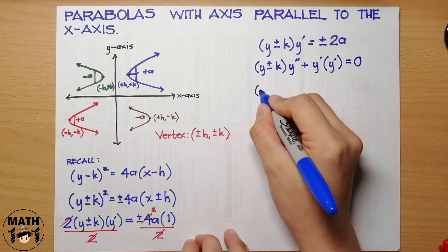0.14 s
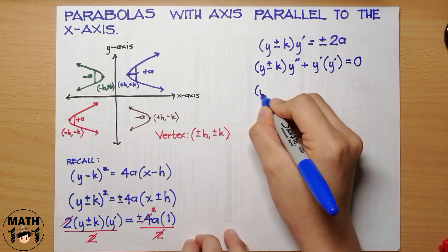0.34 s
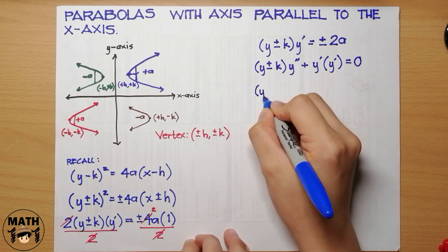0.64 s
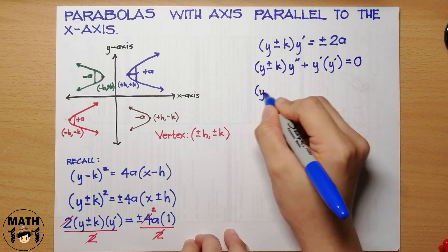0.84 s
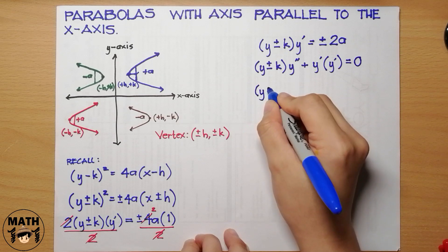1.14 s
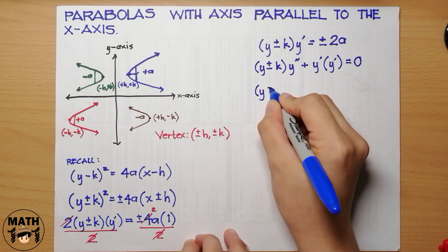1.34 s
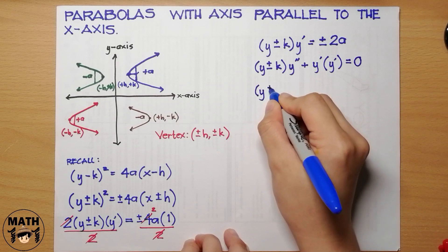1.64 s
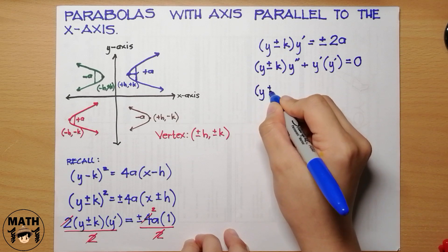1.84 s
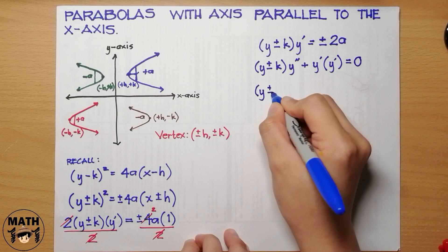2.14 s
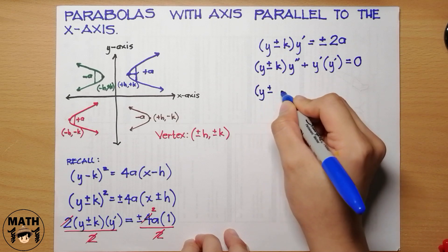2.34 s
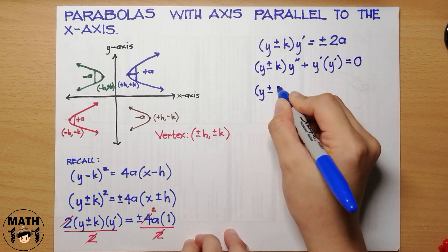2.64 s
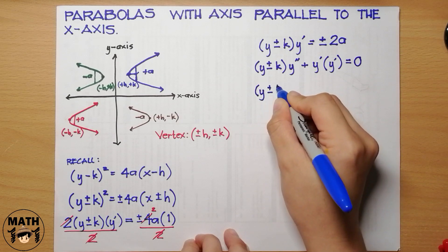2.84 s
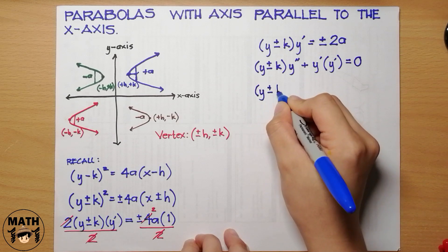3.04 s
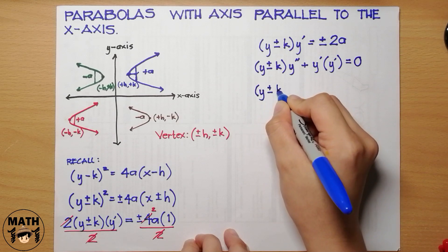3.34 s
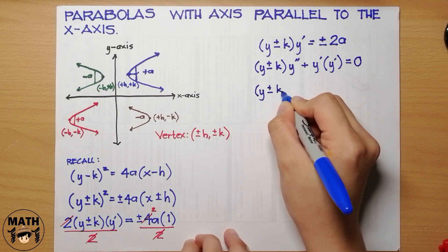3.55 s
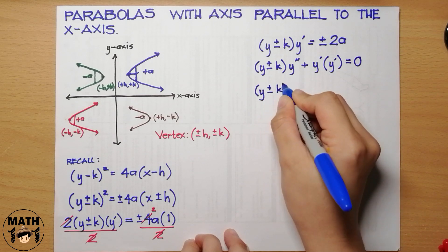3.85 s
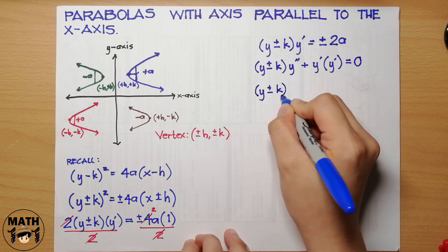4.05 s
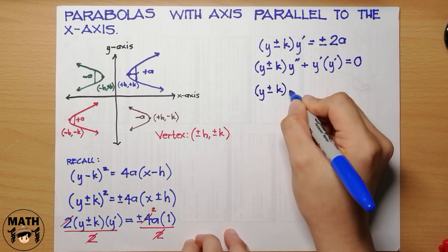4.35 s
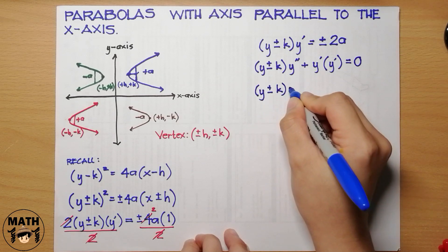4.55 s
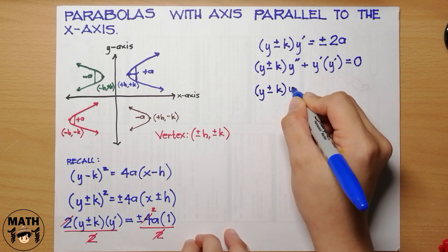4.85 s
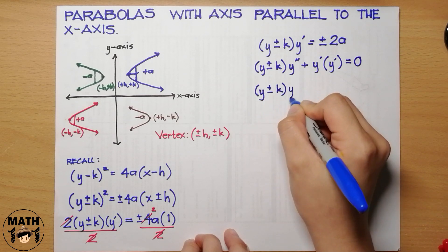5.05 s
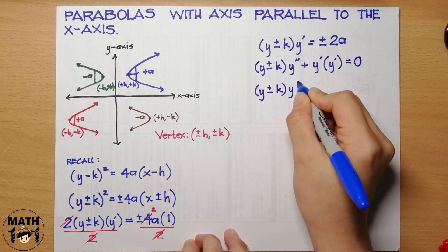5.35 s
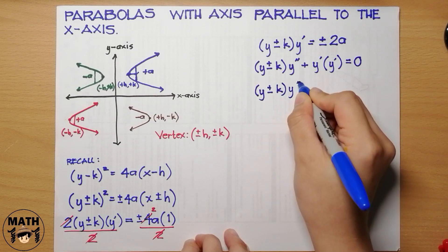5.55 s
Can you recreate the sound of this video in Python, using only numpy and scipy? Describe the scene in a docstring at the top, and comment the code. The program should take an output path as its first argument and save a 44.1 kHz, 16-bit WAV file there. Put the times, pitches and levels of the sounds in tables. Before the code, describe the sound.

A felt-tip marker writes on a sheet of paper on a wooden desk, close to the microphone in a quiet room. Short dry rubs and raspy scratches come in small groups, densest around the first second, then sparser single strokes with pauses. Tiny pen clicks, felt ticks and dull hand bumps fall between them. A very low hum, slow uneven drone and faint hiss run throughout.

```python
"""Felt-tip marker on paper

A felt-tip marker writes a line of algebra on a sheet of paper lying on a wooden desk, close to a microphone.
Stick-slip of the felt on the fibres makes each stroke: random impulses, stronger with tip speed, are
filtered into a woody rub, a rasp and a bright scratch. Decaying noise bursts make the ticks and brushes of the
felt and the pen's small creak, knocks and clicks; damped sines make the bumps of the hand on the desk.
Two drifting sines make a low hum and drone, with a boom of the desk, over the filtered noise of the room."""
import sys
import numpy as np
from scipy.fft import rfft, irfft, next_fast_len
from scipy.io import wavfile
from scipy.ndimage import map_coordinates

SR = 44100
rng = np.random.default_rng(int(sys.argv[2]) if len(sys.argv) > 2 else 0)


def wrap_up_sound(samples):
    """Save the sound to the file named by the first command line argument, as 16-bit audio."""
    columns = np.atleast_2d(samples).T
    # keep every value between -1 and 1, then stretch to whole-number steps
    tamed = np.clip(columns, -1, 1)
    steps = np.round(tamed * 32767).astype(np.int16)
    wavfile.write(sys.argv[1], SR, steps)


N = 250652  # length [samples]


def amp(db):
    """Decibel law: the amplitude ratio of a level in dB."""
    return 10 ** (np.asarray(db) / 20)


def unit(x):
    """Normalisation: scale to a root mean square of 1."""
    return x / np.sqrt(np.mean(x ** 2) + 1e-20)


def along(points, hz):
    """Logarithmic interpolation: (frequency, level) points read on a log frequency axis."""
    frequencies, levels = np.transpose(points)
    return np.interp(np.log(hz + 1), np.log(frequencies + 1), levels)


def wobble(rate):
    """Band-limited randomness: a smooth curve through random knots, rate of them a second."""
    knots = rng.standard_normal(int(N * rate / SR) + 4)
    return map_coordinates(knots, [np.arange(N) * rate / SR])


def coloured(x, colour):
    """Minimum-phase filtering: a causal filter of unit power gain, shaped by colour(Hz) in dB."""
    size = 2 * next_fast_len(len(x) // 2 + 4096)
    gain = unit(amp(colour(np.fft.rfftfreq(size, 1 / SR))))
    cepstrum = irfft(np.log(gain + 1e-6))
    # folding the cepstrum onto positive times makes the filter causal
    cepstrum[1:size // 2] *= 2
    cepstrum[size // 2 + 1:] = 0
    response = np.exp(rfft(cepstrum))
    return irfft(rfft(x, size) * response)[:len(x)]


def add(out, start, db, sound):
    """Superposition: add a short sound at start [s] with its peak at db."""
    out[round(start * SR):][:len(sound)] += amp(db) * sound / np.abs(sound).max()


# Resonances of pen, sheet and desk, and one hollow near 10.5 kHz: (centre frequency [Hz], full width at 1/e of
# the lift [Hz], relative lift [dB])
BODY_RESONANCES = [(540, 84, 9.5), (663, 72, 11), (744.4, 118, 13.5), (855, 160, 10), (1070.5, 73, 11.5),
                   (1131, 48, 10), (1294, 82, 10.5), (1400, 143, 10.5), (1721, 117, 10.5), (2018, 115, 10),
                   (2142, 137, 15), (2320, 260, 10.5), (2556, 82, 10), (2707, 67, 8.5), (2980, 150, 10.5),
                   (3190, 200, 5), (3520, 1050, 6.5), (4390, 97, 11.5), (5470, 530, 6), (6670, 650, 8),
                   (7450, 130, 13), (8390, 450, 6), (8810, 500, 7), (9500, 280, 0.5), (10500, 350, -4),
                   (11380, 330, 6.5)]


def body(hz):
    """Resonance: the lift in dB that the struck or rubbed body gives near each of its modes."""
    return sum(lift * np.exp(-(2 * (hz - centre) / width) ** 2) for centre, width, lift in BODY_RESONANCES)


def tip_speed(start, rise, fall):
    """Kinematics: the tip speeds up from rest to 1 and slows to rest again, in two quarter sines."""
    corners = [start, start + rise, start + rise + fall]
    return np.sin(np.pi / 2 * np.interp(np.arange(N) / SR, corners, [0, 1, 0]))


def catches(rate, spread_db):
    """Stick-slip: fibres catch and let go at random moments, each with its own sign and strength."""
    caught = rng.random(N) < rate / SR
    signs = rng.choice([-1, 1], N)
    strengths = amp(spread_db * rng.standard_normal(N))
    return unit(caught * signs * strengths)


def friction(colour, grip, levels_db, power, rate):
    """Source and filter: catches, stronger the faster the tip moves, ring through the resonances."""
    forces = [amp(db) * tip_speed(*stroke[:3]) ** power for stroke, db in zip(STROKES, levels_db)]
    force = np.max(forces, axis=0)  # where strokes overlap, the stronger one counts
    excitation = force * grip * catches(rate, spread_db=2.5)
    return coloured(excitation, lambda hz: along(colour, hz) + body(hz))


# Movements of the tip: (start time [s], speeding-up time [s], slowing-down time [s],
# then the relative levels at full speed of rub [dB], rasp [dB] and scratch [dB])
STROKES = [ (-0.06, 0.1, 0.093, -54.5, -66, -59), (0.075, 0.074, 0.049, -58, -60, -71),
           (0.664, 0.049, 0.097, -57.5, -65, -69), (0.802, 0.03, 0.084, -59, -59, -55),
           (0.87, 0.047, 0.036, -61, -60, -71), (1.01, 0.057, .12, -54.5, -59, -64),
           (1.11, 0.059, .02, -52, -70, -57), (1.18, 0.025, 0.021, -52, -45.5, -49.5),
           (1.72, .016, 0.069, -54.5, -59.5, -67.5), (2.081, 0.042, 0.058, -56.5, -61, -65.5),
           (2.459, 0.017, 0.091, -53.5, -53.5, -58), (3.3, 0.063, 0.096, -55.5, -58.5, -64),
           (3.671, 0.014, 0.079, -58.5, -71, -56.5), (3.86, 0.052, 0.081, -57, -59, -67),
           (4.28, 0.091, 0.13, -56, -59, -66), (4.41, 0.077, 0.023, -59, -60.5, -53.5),
           (5.088, 0.017, .115, -57.5, -61.5, -68), (5.178, 0.041, 0.096, -61, -63.5, -57),
           (5.35, 0.088, .09, -59.5, -58.5, -65), (5.45, 0.096, 0.024, -57.5, -58.5, -52.5), ]
# Colour of the desk's rub: (frequency [Hz], relative level [dB])
RUB_COLOUR = [(120, -35), (250, -0.5), (400, -2.5), (600, -4), (1000, 1), (1400, 5), (1800, 5.5),
              (2200, -5.5), (2800, -2.5), (4000, -15), (8000, -30), (16000, -41)]
# Colour of the sheet's rasp: (frequency [Hz], relative level [dB])
RASP_COLOUR = [(600, -28.5), (1800, -8.5), (2500, -3.5), (3400, 0), (4200, -4.5), (5000, -11.5),
               (8000, -20.5), (16000, -12)]
# Colour of the felt's fast scratch: (frequency [Hz], relative level [dB])
SCRATCH_COLOUR = [(300, -35), (1000, -14), (2000, 0), (2800, -4.5), (3700, -2), (5000, -4), (8000, -0.5),
                  (9500, 4), (11500, -3.5), (13000, 1), (14200, -3), (15500, -10)]
# each layer grows as tip speed to this power: the scratch needs the most speed
RUB_POWER, RASP_POWER, SCRATCH_POWER = 0.79, 0.84, 1.14


def marker(judder_db, tooth_db, rub_db, rasp_db, scratch_db):
    """Dry friction: uneven paper shakes the grip; the more frequent the catches, the brighter the layer."""
    grip = unit(amp(judder_db * wobble(70) + tooth_db * wobble(450)))
    *_, rubs, rasps, scratches = np.transpose(STROKES)
    # rates are mean catches a second
    rub = friction(RUB_COLOUR, grip, rubs + rub_db, RUB_POWER, rate=7000)
    rasp = friction(RASP_COLOUR, grip, rasps + rasp_db, RASP_POWER, rate=14000)
    scratch = friction(SCRATCH_COLOUR, grip, scratches + scratch_db, SCRATCH_POWER, rate=15000)
    return rub + rasp + scratch


# Level of the low drone near 65 Hz, with the desk's boom near 1.14 s: (time [s], relative level [dB])
DRONE_LEVEL = [(0.0, -55.5), (0.3, -46.5), (0.33, -56), (1.0, -54), (1.14, -39.5), (1.33, -56), (1.74, -60),
               (1.79, -45.5), (2.21, -59.5), (2.26, -48.5), (2.58, -64.5), (2.61, -50.5), (3.81, -48),
               (3.92, -54.5), (4.46, -49.5), (4.71, -57.5), (5.16, -50), (5.68, -65.5)]
HUM_HZ = 32.63  # mean turning rate


def hum(shaft_db, sway_db, drone_db, drift):
    """Harmonics of rotation: a slow machine hums at its turning rate, under a drone about an octave above."""
    def phase():
        """Phase as the integral of frequency; every call draws its own drift."""
        return 2 * np.pi * np.cumsum(HUM_HZ * (1 + drift * wobble(6))) / SR

    shaft = amp(shaft_db + sway_db * wobble(10)) * np.sin(phase())
    level_db = np.interp(np.arange(N) / SR, *np.transpose(DRONE_LEVEL))
    drone = amp(level_db + drone_db) * np.sin(2 * phase())
    return np.sqrt(2) * (shaft + drone)  # a sine of rms 1 peaks at root 2


# Colour of the building's rumble: (frequency [Hz], relative level [dB])
RUMBLE_COLOUR = [(10, -37.5), (25, -9.5), (40, -5.5), (49, 2.5), (57, -3), (78, 2.5), (96, -11),
                 (130, -6.5), (170, -18.5), (250, -21.5), (290, -25.5), (380, -27.5), (500, -41.5),
                 (900, -71.5)]
# Colour of the faint hiss: (frequency [Hz], relative level [dB])
HISS_COLOUR = [(200, -10), (500, -1), (1100, 0), (1800, -3.3), (3600, -2.5), (4500, -6), (4900, -9),
               (5400, -6.5), (9700, -7.5), (10400, -13), (11000, -8.5), (13000, -7.5), (15500, -10)]


def room(rumble_db, hiss_db):
    """Stationary noise: low rumble of the building under an even, faint hiss."""
    rumble = coloured(rng.standard_normal(N), lambda hz: along(RUMBLE_COLOUR, hz))
    hiss = coloured(rng.standard_normal(N), lambda hz: along(HISS_COLOUR, hz))
    return amp(rumble_db) * rumble + amp(hiss_db) * hiss


def contact_burst(centre, width, t60, body_share):
    """Contact excitation: a short decaying burst of noise rings in its own band and in the body."""
    t = np.arange(SR // 8) / SR
    burst = rng.standard_normal(len(t)) * amp(-60 * t / t60)

    def band(hz):
        """Single-resonance response in dB."""
        detuning = (hz ** 2 - centre ** 2) / (2 * width * (hz + 1))
        return -20 * np.log10(1 + detuning ** 2)

    return coloured(burst, lambda hz: band(hz) + body_share * body(hz))


# The felt touches the paper with a dry tick or a faint, longer brush:
# (time [s], relative peak level [dB], decay time by 60 dB of the burst, which is cut at 1/8 s [s])
TOUCHES = [(0.584, -56.5, 0.028), (1.288, -50.5, 0.034), (1.619, -53, 0.023), (2.666, -53.5, 0.34),
           (2.809, -53.5, 0.08), (3.509, -48.5, 0.037), (4.556, -59, 0.2), (4.599, -56, 0.058)]
TOUCH_HZ, TOUCH_WIDTH_HZ = 5300, 7500
# Small creak, knocks and clicks of the pen: (time [s], relative peak level [dB],
# ring frequency [Hz], bandwidth [Hz], decay time by 60 dB of the burst [s])
PEN_NOISES = [(0.33, -50, 3830, 450, 0.018), (0.33, -53, 970, 500, 0.022), (0.342, -51, 2740, 220, .021),
              (0.364, -55, 2700, 220, 0.033), (0.423, -58, 1190, 900, .03), (0.449, -52.5, 990, 800, .047),
              (0.558, -42.5, 1230, 505, 0.011), (0.559, -50.5, 2230, 170, .02),
              (0.921, -45.5, 3590, 200, 0.021), (5.3, -49, 1900, 1400, 0.063)]


def small_contacts(touch_db, pen_db, body_share):
    """Contact spectra: touches of the felt share one broad band; each small pen noise rings in its own."""
    out = np.zeros(N + SR)
    for start, db, t60 in TOUCHES:
        add(out, start, db + touch_db, contact_burst(TOUCH_HZ, TOUCH_WIDTH_HZ, t60, body_share))
    for start, db, centre, width, t60 in PEN_NOISES:
        add(out, start, db + pen_db, contact_burst(centre, width, t60, body_share))
    return out[:N]


# The hand and pen bump the desk: (time [s], relative peak level [dB], middle mode frequency [Hz])
BUMPS = [(0.428, -58, 298), (0.601, -57, 195), (0.921, -48.5, 341), (0.923, -43, 161), (2.415, -52.5, 232),
         (2.670, -54, 213), (3.384, -52, 198), (3.632, -45.5, 128), (4.255, -53.5, 231),
         (5.026, -46.5, 164)]
BUMP_CYCLES = 17.3  # cycles of the middle mode in which a bump decays by 60 dB


def bumps(level_db, attack, spread):
    """Damped modes: a soft blow wakes three close modes of the desk top; lower-pitched bumps last longer."""
    out = np.zeros(N + SR)
    t = np.arange(SR // 4) / SR
    for start, db, hz in BUMPS:
        # the outer modes lie a factor spread below and above, at half amplitude
        modes = sum(np.sin(2 * np.pi * hz * spread ** k * t) / (1 + abs(k)) for k in (-1, 0, 1))
        decay = amp(-60 * t * hz / BUMP_CYCLES)
        onset = 1 - np.exp(-t / attack)
        add(out, start, db + level_db, modes * decay * onset)
    return out[:N]


def nearby(x, echo_db, reach, count):
    """Comb interference: weak copies from things around the desk, up to reach [s] late, ripple the spectrum."""
    delays = rng.uniform(reach / 2, reach, count)
    copies = sum(rng.choice([-1, 1]) * np.pad(x, (round(delay * SR), 0))[:N] for delay in delays)
    return x + amp(echo_db) * copies / np.sqrt(count)


def scene():
    """Superposition: pen, hand and room at one microphone."""
    writing = marker(judder_db=1.0, tooth_db=0.76, rub_db=0.04, rasp_db=-1.5, scratch_db=-0.15)
    background = hum(shaft_db=-54, sway_db=1.1, drone_db=-1.2, drift=0.01236)
    background += room(rumble_db=-54.5, hiss_db=-67.5)
    contacts = small_contacts(touch_db=2.0, pen_db=0.0, body_share=0.93)
    contacts += bumps(level_db=0.5, attack=0.0015, spread=1.3)  # attack [s], spread as a ratio
    pen = nearby(writing + contacts, echo_db=-14.0, reach=0.02, count=7)
    return (pen + background)[None]


TOP_HZ = 15730  # upper band limit


def record(dry):
    """Ideal low-pass: the recorder keeps nothing above its band limit."""
    size = next_fast_len(N + SR // 2)
    passed = np.fft.rfftfreq(size, 1 / SR) < TOP_HZ
    return irfft(rfft(dry, size) * passed, size)[:, :N]


dry = scene()
out = record(dry)
wrap_up_sound(out)
```